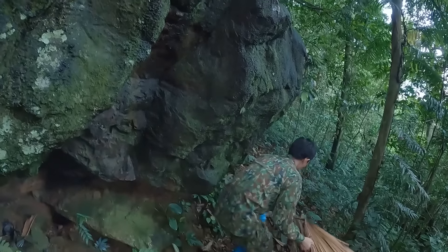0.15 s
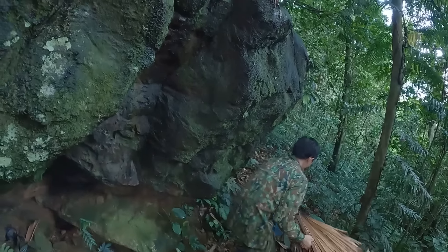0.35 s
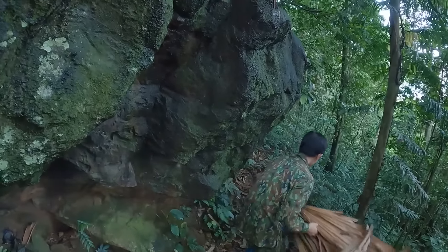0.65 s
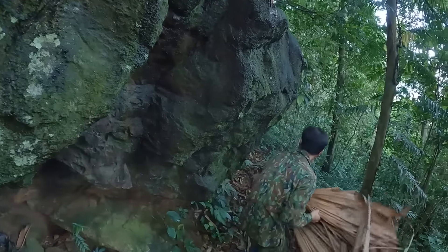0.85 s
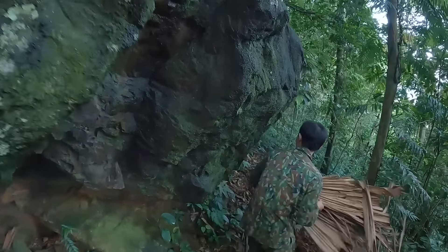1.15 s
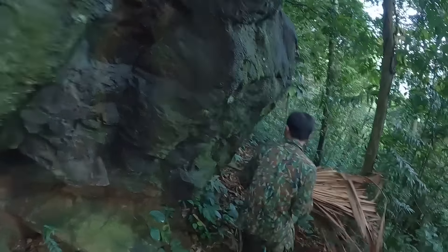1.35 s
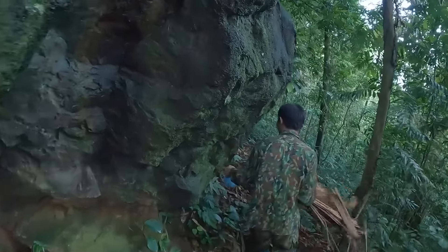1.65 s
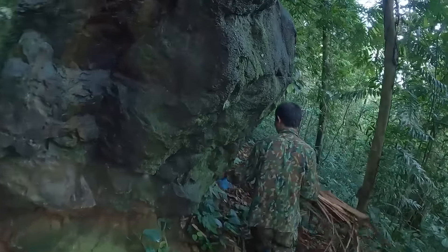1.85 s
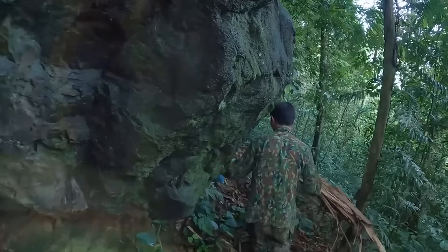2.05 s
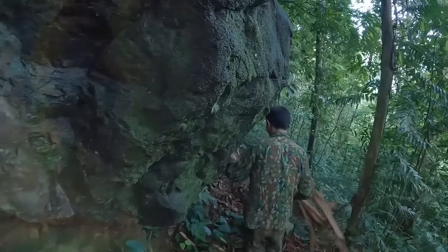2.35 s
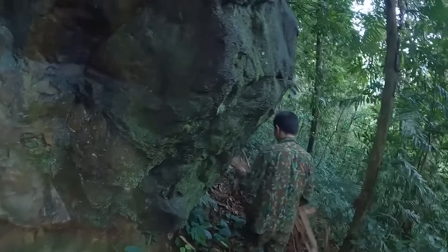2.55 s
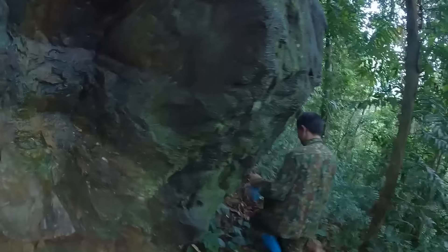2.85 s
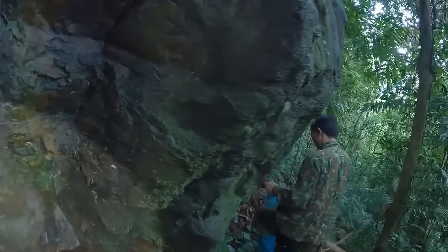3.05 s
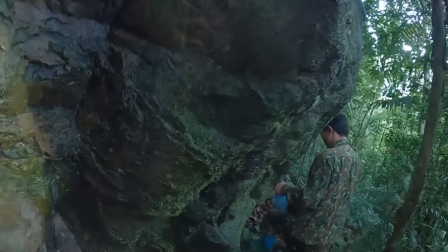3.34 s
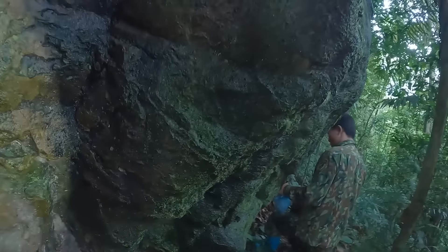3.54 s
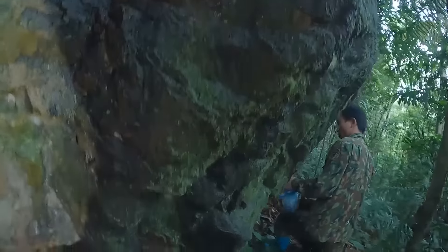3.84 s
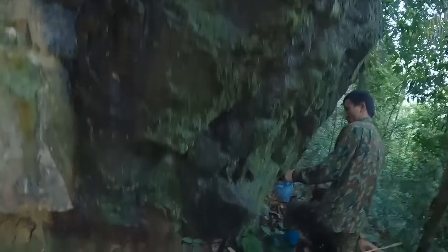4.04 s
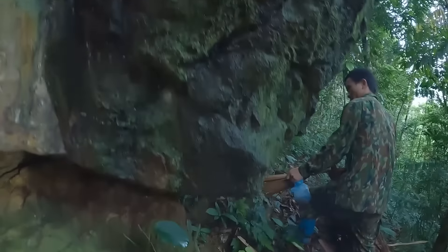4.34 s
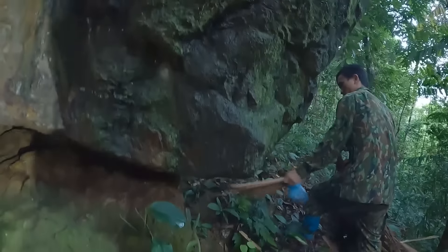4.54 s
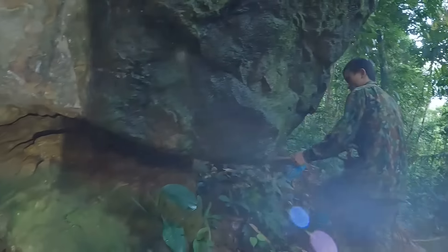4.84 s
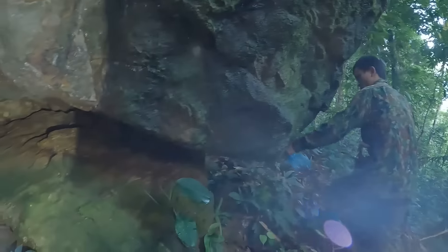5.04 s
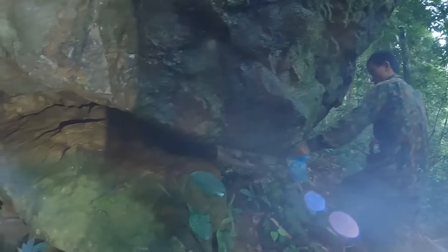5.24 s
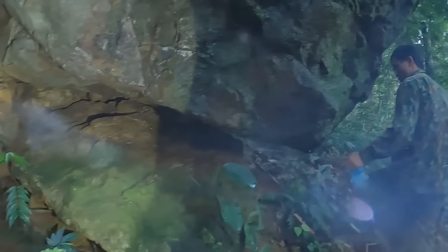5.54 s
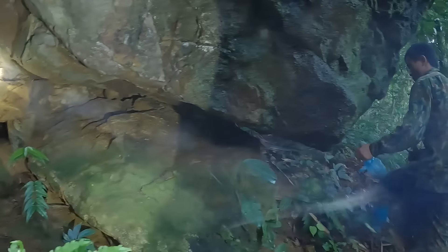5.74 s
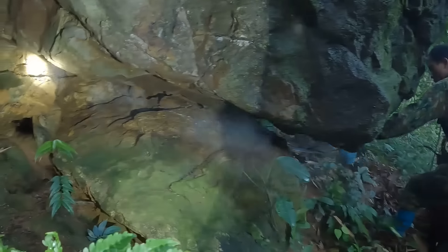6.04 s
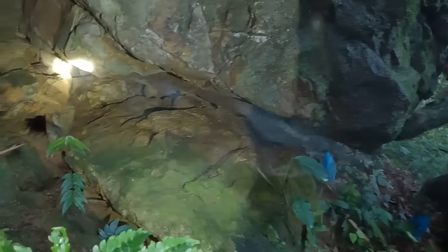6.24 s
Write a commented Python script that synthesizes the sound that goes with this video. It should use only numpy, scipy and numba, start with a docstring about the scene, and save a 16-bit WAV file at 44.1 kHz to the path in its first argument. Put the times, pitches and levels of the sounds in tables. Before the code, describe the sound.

Dry palm fronds rustle and crackle as they are lifted and dragged, peaking in a loud crunch, then thinning to sparse snaps over faint insect hiss.

```python
"""Dry palm fronds and leaf litter are lifted, dragged and stuffed under a rock face in a forest.
Countless leaf snaps, as noise under random envelopes and damped rings, make the rustle; stiff ribs scrape lower.
Single stalks crack as a tick with a dying tail; steps and handling thud in the camera body as a ring and a bump.
A thin insect band hisses over the quiet forest air, both made of filtered noise."""
import sys
import numpy as np
from scipy import signal
from scipy.fft import rfft, irfft, next_fast_len
from scipy.io import wavfile
from scipy.ndimage import uniform_filter1d
from numba import njit

SR = 44100
rng = np.random.default_rng(int(sys.argv[2]) if len(sys.argv) > 2 else 0)


def master_out(mix):
    """Clip the mix to full scale and print it as 16-bit PCM to the path in sys.argv[1]."""
    frames = np.transpose(np.atleast_2d(mix))
    ceiling = np.clip(frames, -1, 1)
    pcm = np.round(ceiling * 32767).astype(np.int16)
    wavfile.write(sys.argv[1], SR, pcm)


N = 281836

# spectrum of thin leaf edges, with two bands that the housing lifts: frequency_hz, density_db (per Hz)
EDGE_SPECTRUM = [(4200, -29.5), (5000, -17.5), (5800, -29), (6100, 4), (7500, 3), (7900, -4), (9300, -8),
                 (9800, 2), (12200, 1.5), (12600, -9.5), (14500, -22.5), (15500, -33.5)]
# spectrum of stiff ribs, with the band near 2.7 kHz that the housing lifts: frequency_hz, density_db (per Hz)
RIB_SPECTRUM = [(600, -28.5), (850, -11.5), (1000, -1), (1500, 0), (2200, -1.5), (2450, 2), (3000, 3),
                (3300, -0.5), (3900, 3), (4300, 2.5), (5000, 1), (6000, 1.5), (7500, -37)]
# spectrum of the hollow stalk: frequency_hz, density_db (per Hz)
STALK_SPECTRUM = [(260, -31.5), (310, -1), (500, -4.5), (630, -0.5), (860, 3), (1020, 6.5), (1300, -22.5)]
# the fronds drag along: time_s, edge_level_db, rib_level_db
DRAG_LEVELS = [(0, -35.5, -42.5), (0.24, -35, -38.5), (0.36, -41, -45.5), (0.52, -32, -37),
               (0.74, -30, -37.5), (1.0, -30, -36.5), (1.13, -32, -40.5), (1.45, -32, -41),
               (1.55, -31, -39), (1.8, -24.5, -31.5), (2.0, -32, -38), (2.08, -34.5, -40.5),
               (2.3, -35, -42.5), (2.43, -49, -47), (2.56, -36.5, -44.5), (3.06, -38.5, -44.5),
               (3.5, -41.5, -46.5), (3.7, -48, -51), (3.85, -44.5, -46), (4.09, -51.5, -52),
               (4.3, -49, -49.5), (4.5, -47, -47.5), (4.75, -36.5, -38.5), (4.88, -50.5, -48),
               (5.05, -53.5, -55.5), (5.4, -55, -57), (5.6, -54.5, -49.5), (5.78, -70, -70),
               (6.39, -75.5, -71.5)]


def undb(db):
    """Amplitude ratio from its logarithmic level."""
    return 10 ** (np.asarray(db) / 20)


def unit(x):
    """Normalise a signal to unit root-mean-square amplitude."""
    return x / np.sqrt(np.mean(x ** 2))


def curves(table):
    """Linear interpolation: columns of a table joined by straight lines in time."""
    s, *columns = np.transpose(table)
    return [np.interp(np.arange(N) / SR, s, c) for c in columns]


def response(shape, size, beyond=None):
    """Transfer function: gain at every bin, level interpolated over log frequency."""
    hz, db = np.transpose(shape)
    bin_hz = np.arange(size // 2 + 1) * SR / size
    return undb(np.interp(np.log(bin_hz + 1), np.log(hz), db, left=beyond, right=beyond))


def colour(x, shape):
    """Spectral shaping by a power-normalised filter; white noise keeps its level."""
    size = next_fast_len(N + 4096)
    gain = response(shape, size, beyond=-120)
    return irfft(rfft(x, size) * gain / np.sqrt(np.mean(gain ** 2)), size)[..., :N]


def pair():
    """Uncorrelated noises: what both ports share and what they do not."""
    return rng.standard_normal((2, N))


def wander(rate):
    """Random modulation: levels held 1 / rate s and slewed; spread near 1."""
    hold = int(SR / rate)
    steps = np.repeat(rng.standard_normal(N // hold + 1), hold)
    return uniform_filter1d(steps, hold)[:N] * np.sqrt(3 / 2)


def ring(power, t60):
    """Exponential decay: power dies away by 60 dB in t60 s; the mean is kept."""
    keep = np.exp(-2 * np.log(1000) / (t60 * SR))
    return signal.lfilter([1 - keep], [1, -keep], power)


def snaps(rate, spread_db, t60, bed):
    """Random impulses: many small snaps, few large, each with a short scatter off the rock, over an even bed."""
    hit = rng.random(N) < rate / SR
    power = np.zeros(N)
    power[hit] = undb(2 * spread_db * np.minimum(rng.exponential(size=hit.sum()), 5))
    power = ring(power, t60)
    # the hands set the loudness over a tenth of a second, the snaps only the grain
    grain = power / (uniform_filter1d(power, size=6000) + 1e-12)
    return np.sqrt(bed + (1 - bed) * grain)


@njit
def grains(start, turn, fade, size, length):
    """Damped oscillators, each with its own pitch (radians a sample), fade and place between the ports."""
    out = np.zeros((2, length))
    for k in range(len(start)):
        c, r, a, b = 2 * fade[k] * np.cos(turn[k]), fade[k] ** 2, np.sin(turn[k]), 0.
        for i in range(start[k], min(length, start[k] + int(5 / (1 - fade[k])))):
            a, b = c * a - r * b, a
            out[0, i] += size[0, k] * b
            out[1, i] += size[1, k] * b
    return out


def pops(centre_hz, rate, spread_oct, cycles, spread_db):
    """Buckling: bits of dry leaf snap and ring briefly around a pitch; rms near 1."""
    start = np.flatnonzero(rng.random(N) < rate / SR)
    draw = rng.standard_normal((len(start), 4)).T
    hz = np.clip(centre_hz[start] * 2 ** (spread_oct * draw[0]), 300, 15000)
    strength = undb(spread_db * draw[1]) * np.sqrt(hz / centre_hz[start])
    size = strength * np.array([np.sign(draw[2]), draw[3]])
    out = grains(start, 2 * np.pi * hz / SR, np.exp(-hz / cycles / SR), size, N)
    return out / np.sqrt(uniform_filter1d(out[0] ** 2, size=8000) + 1e-12)


@njit
def sweep(x, g, k):
    """State-variable resonance: a band-pass with moving tuning g and damping k."""
    y, b, l = np.empty(len(x)), 0., 0.
    for i in range(len(x)):
        v = (b + g[i] * (x[i] + 1e-18 - l)) / (1 + g[i] * (g[i] + k[i]))
        b, l, y[i] = 2 * v - b, l + 2 * g[i] * v, k[i] * v
    return y


def svf(x, hz, width):
    """Moving resonance scaled by its noise bandwidth; white noise keeps its level."""
    return sweep(x, np.tan(np.pi * hz / SR), width / hz) * np.sqrt(SR / (np.pi * width))


def focus(x, hz, share, shape, width):
    """Resonant excitation: part of a scrape gathers around the pitch of the bending piece; the rest stays wide."""
    wide = colour(x, shape)
    # rough bandwidth of the shape, in Hz
    span = sum(db > -12 for _, db in shape) / len(shape) * shape[-1][0]
    width_hz = width * hz
    near = np.array([svf(svf(v, hz, width_hz), hz, 2 * width_hz) for v in wide])
    near = near * np.sqrt(2 * np.pi * width_hz / SR) * np.sqrt(2 * span / SR)
    return np.sqrt(share) * near + np.sqrt(1 - share) * wide


def played(events, rest_db, rest_hz, rise, fall, sag_db):
    """Power addition: events (start, hold, pitch, levels) swell over rest; pitch is the power-weighted mean."""
    t = np.arange(N) / SR
    power = undb(2 * np.array(rest_db))
    hz = power[0] * rest_hz
    for s, hold, pitch, *db in events:
        slope = np.maximum((s - t) / rise, np.maximum(t - s - hold, 0) / fall)
        envelope = undb(-120 * slope - 2 * sag_db * np.clip(t - s, 0, hold))
        swell = undb(2 * np.array(db))[:, None] * envelope
        power, hz = power + swell, hz + swell[0] * pitch
    return np.sqrt(power), hz / power[0]


def rustle():
    """Shared excitation: thin edges tick, ribs scrape and pop, the stalk groans; some snaps shake all three."""
    # a hand closes on the bundle: start_s, hold_s, edge_level_db, rib_level_db, rib_pitch_hz, stalk_level_db
    grabs = [(0.128, 0.074, -31, -33, 2600, -42.5), (0.413, 0.079, -32.5, -34.5, 1800, -72),
             (0.572, 0.053, -34, -40, 2540, -66), (0.732, 0.022, -29, -42, 2590, -65),
             (0.882, 0.12, -30, -34.5, 3310, -53), (1.139, 0.02, -30.5, -39.5, 2700, -80),
             (1.249, 0.015, -26, -24, 1503, -38), (1.298, 0.054, -30, -32.5, 2360, -54),
             (1.57, 0.028, -21.5, -23.5, 1883, -24.5), (1.608, 0.066, -15.5, -12.5, 2397, -26),
             (1.715, 0.02, -29, -19.5, 2137, -33.5), (1.853, 0.088, -23.5, -26.5, 2750, -61),
             (1.912, 0.095, -18, -25, 2646, -31), (2.308, 0.057, -33.5, -41, 2755, -64),
             (2.403, 0.054, -43, -47, 1633, -50.5), (2.81, 0.12, -35, -39.5, 2417, -40.5),
             (2.952, 0.057, -35, -44.5, 2000, -55), (3.568, 0.13, -43, -51, 2870, -54),
             (3.993, 0.053, -40.5, -39.5, 2760, -62), (4.123, 0.063, -39.5, -55, 1400, -69),
             (4.216, 0.074, -38.5, -46.5, 3136, -54.5), (4.369, 0.046, -44, -33.5, 2284, -45),
             (4.564, 0.11, -30, -21, 3310, -41.5), (4.652, 0.062, -38, -31.5, 2590, -55),
             (4.761, 0.077, -40, -40, 4390, -74), (4.926, 0.031, -41.5, -45.5, 3230, -60),
             (5.364, 0.12, -45, -48.5, 2005, -61.5), (5.234, 0.026, -47.5, -52, 3520, -74),
             (5.442, 0.035, -27, -18.5, 2006, -29.5), (5.494, 0.039, -36, -29, 2250, -43.5),
             (6.369, 0.033, -30, -28, 1490, -30.5)]
    # the hollow stalk is knocked: start_s, hold_s, pitch_hz, level_db
    knocks = [(0.115, 0.024, 855, -44), (0.225, 0.023, 600, -44), (0.6, 0.088, 390, -42),
              (0.8, 0.054, 436, -42.5), (1.24, 0.0063, 824, -20), (1.59, 0.09, 330, -36),
              (1.865, 0.047, 1040, -36.5), (1.972, 0.045, 990, -29.5), (2.4, 0.068, 756, -43),
              (2.775, 0.019, 326, -41.5), (2.825, 0.07, 865, -46), (2.98, 0.056, 662, -47),
              (3.455, 0.018, 391, -45.5), (3.75, 0.1, 392, -50), (4.01, 0.069, 380, -50),
              (4.13, 0.035, 390, -48.5), (4.371, 0.0061, 445, -30.5), (4.62, 0.043, 575, -36.5),
              (5.44, 0.017, 313, -28), (5.5, 0.064, 335, -50)]
    # level of the ribs above 4 kHz: time_s, level_db (re their usual colour)
    rib_treble = [(0, 6.5), (.4, -9), (.6, 8.5), (1.5, -1.5), (1.75, 2), (2.0, 3.5), (2.1, 4.5), (2.5, -2),
                  (4.3, 0), (6.39, 1)]
    # part of the rib scrape gathered at its pitch: time_s, share (0-1)
    rib_focus = [(0, 0.88), (2.05, 0), (2.12, 0.55), (2.42, 0.5), (2.5, 0), (6.39, 0)]
    drag_rib_hz, drag_stalk_db = 2678, -16  # stalk level re ribs
    stalk_centre_hz, stalk_wander_oct, stalk_wander_per_s = 656, 0.73, 10
    # rise and fall: time to gain or lose 60 dB; sag: the grip slackens while it holds
    grab_rise_s, grab_fall_s, grab_sag_db_per_s = 0.049, 0.15, 21
    knock_rise_s, knock_fall_s, knock_sag_db_per_s = 0.013, 0.08, 58.5

    edge_db, rib_db = curves(DRAG_LEVELS)
    # the ribs come first because the first level steers the pitch
    events = [(s, hold, hz, rib, edge, stalk) for s, hold, edge, rib, hz, stalk in grabs]
    gains, rib_hz = played(events, [rib_db, edge_db, rib_db + drag_stalk_db], drag_rib_hz,
                           grab_rise_s, grab_fall_s, grab_sag_db_per_s)
    rib_gain, edge_gain, stalk_gain = gains
    stalk_hz = np.clip(stalk_centre_hz * 2 ** (stalk_wander_oct * wander(stalk_wander_per_s)), 300, 950)
    (stalk_gain,), stalk_hz = played(knocks, [20 * np.log10(stalk_gain)], stalk_hz,
                                     knock_rise_s, knock_fall_s, knock_sag_db_per_s)

    shared = snaps(rate=600, spread_db=2.5, t60=0.025, bed=0.5)
    edges = pair() * snaps(rate=11000, spread_db=0.5, t60=0.09, bed=0.75)
    # lone dry ticks stand out of the wash
    ticks = pair() * snaps(rate=70, spread_db=4.0, t60=0.01, bed=0) * undb(-9)
    edge_pops = pops(np.full(N, 8500.), rate=780, spread_oct=0.56, cycles=260, spread_db=7.5)
    edges += ticks + undb(-9.5) * edge_pops

    scrape = pair() * snaps(rate=2100, spread_db=2.5, t60=0.031, bed=0.41)
    scrape = shared * (undb(-3.5) * ticks + scrape)
    ribs = focus(scrape, rib_hz, curves(rib_focus)[0], RIB_SPECTRUM, width=0.35)
    ribs += undb(-1.5) * shared * pops(rib_hz, rate=800, spread_oct=0.5, cycles=12, spread_db=3)
    treble = signal.sosfiltfilt(signal.butter(4, 4000, "high", fs=SR, output="sos"), ribs)
    ribs += (undb(curves(rib_treble)[0]) - 1) * treble

    stalk = focus(pair() * shared, stalk_hz, 0.9, STALK_SPECTRUM, width=0.42)
    return colour(edges * shared, EDGE_SPECTRUM) * edge_gain + ribs * rib_gain + stalk * stalk_gain


def thuds():
    """Structure-borne sound: grip and footfall shake the camera body, a boxy ring and a duller bump."""
    # thuds in the camera body: start_s, hold_s, ring_level_db, ring_pitch_hz, dull_level_db
    blows = [(0.188, 0.07, -53.5, 215.5, -73), (0.44, 0.024, -55, 208, -78), (0.49, 0.038, -64, 198, -60),
             (0.582, 0.054, -53, 202, -78), (1.24, 0.081, -53.5, 195.7, -80),
             (1.531, 0.029, -38, 169.8, -60), (1.574, 0.093, -25.5, 233.9, -40.5),
             (1.73, 0.014, -36.5, 204.6, -61.5), (1.805, 0.087, -45.5, 228.6, -53.5),
             (1.913, 0.069, -39.5, 222.7, -67), (2.485, 0.021, -55.5, 170, -78),
             (2.794, 0.061, -58, 189.2, -51.5), (2.869, 0.069, -39.5, 157.2, -43.5),
             (2.976, 0.053, -46, 175.8, -49), (3.043, 0.53, -51, 161.2, -72),
             (3.114, 0.034, -52, 162.7, -63), (3.22, 0.047, -59, 184, -64), (3.383, 0.1, -50.5, 177, -83),
             (3.484, 0.047, -49.5, 163, -44), (3.977, 0.093, -63, 194.7, -57),
             (4.182, 0.15, -69.5, 158.5, -60), (4.366, 0.021, -54, 239, -72), (4.444, 0.027, -57, 206, -81),
             (4.556, 0.079, -37, 202.7, -48), (4.673, 0.065, -48, 202.3, -61),
             (5.44, 0.016, -35.5, 268.6, -41), (5.485, 0.043, -50.5, 243, -68),
             (6.008, 0.049, -70.5, 160.6, -69), (6.119, 0.089, -70, 167.5, -62.5),
             (6.261, 0.053, -77, 152, -59), (6.37, 0.033, -41.5, 183, -46)]
    # spectrum of the wide part of the boxy ring: frequency_hz, density_db (per Hz)
    body_spectrum = [(100, -29), (135, -4.5), (165, 6), (200, -15), (240, -10.5), (290, -22), (350, -28.5)]
    # spectrum of the dull bump: frequency_hz, density_db (per Hz)
    dull_spectrum = [(25, -28.5), (45, -20.5), (90, -3), (112, -5), (135, -35)]
    rise_s, fall_s, sag_db_per_s = 0.049, 0.18, 18.5  # time to gain or lose 60 dB; slackening in the hold
    grip_db, grip_dull_db, grip_hz = -68.5, -87.5, 190  # rumble between thuds, with the ribs at -45 dB
    grip_follows = 0.631  # dB the rumble gains for each dB of the dragged ribs
    body_width_hz = 53
    steady = 0.55  # share of the narrow ring's power that is a clean tone

    effort_db = grip_follows * (curves(DRAG_LEVELS)[1] + 45)
    rest_db = [grip_db + effort_db + 4.5 * wander(12), grip_dull_db + effort_db + 1.9 * wander(2.4)]
    events = [(s, hold, hz, db, dull) for s, hold, db, hz, dull in blows]
    (gain, dull_gain), ring_hz = played(events, rest_db, grip_hz, rise_s, fall_s, sag_db_per_s)

    width = np.full(N, float(body_width_hz))
    shaken = pair() * snaps(rate=9.9, spread_db=10.0, t60=0.68, bed=1.0)
    boxy = np.array([svf(svf(v, ring_hz, width), ring_hz, 3 * width) for v in shaken])
    phase = 2 * np.pi * np.cumsum(ring_hz * (1 + 0.0504 * wander(25))) / SR
    tone = np.sqrt(2) * np.sin(phase) * undb(1.2 * wander(20))
    # the tone is common to both ports
    boxy = np.sqrt(1 - steady) * unit(boxy) + np.sqrt(steady) * tone * [[1], [0]]
    boxy = boxy + undb(-5.5) * colour(pair(), body_spectrum)
    return gain * boxy + dull_gain * colour(pair(), dull_spectrum)


def forest():
    """Broadband and narrow-band noise: quiet air with faint far ticks, and a band of distant insects."""
    # spectrum of the air: frequency_hz, density_db (per Hz)
    air_spectrum = [(24, -34.5), (40, -8), (182, -7), (291, -8.5), (466, -8), (728, -14), (1260, -4.5),
                    (2850, -14), (3350, -10), (3750, -3), (4500, -9.5), (5430, -28), (6950, -18.5),
                    (12300, -29.5), (15000, -40.5)]
    air_db, insect_db = -60.5, -64
    hz, w = 3700, 170  # insect pitch and width, Hz

    air = pair() * snaps(rate=82, spread_db=2.0, t60=0.05, bed=0.84)
    band = [(hz - 2 * w, -25), (hz - w, -4), (hz, 0), (hz + w, -4), (hz + 2 * w, -25)]
    return colour(air, air_spectrum) * undb(air_db) + colour(pair(), band) * undb(insect_db)


def cracks():
    """Brittle fracture: a sharp tick, then splinters and echo dying away in three colours, treble first."""
    # single cracks: start_s, tick_level_db (re the tail), bright_tail_db, middle_tail_db, middle_pitch_hz
    breaks = [(0.155, 2, -21, -31.5, 2820), (0.258, 4, -26.5, -28, 2400), (0.276, 4, -25.5, -26.5, 2270),
              (0.411, -3.5, -47, -25.5, 2600), (0.428, -7, -34, -14, 1620), (0.466, 1.5, -40, -26, 1290),
              (0.468, 0, -21, -29.5, 2870), (0.577, -4, -29, -28, 2700), (0.598, -6, -22, -18.5, 2320),
              (0.631, -3.5, -18.5, -28.5, 2640), (0.665, -7.5, -20.5, -38, 2590),
              (0.694, 9.5, -37, -30, 2460), (0.851, 5, -24, -27.5, 2980), (0.899, -4, -17.5, -23, 3510),
              (1.2391, 11, -20.5, -16, 1160), (1.244, 9, -19.5, -18, 1535), (1.248, 11, -22, -27, 3190),
              (1.422, -4.5, -25.5, -28, 2600), (1.514, 0.5, -22.5, -29.5, 2640),
              (1.543, -10.5, -27.5, -23, 1543), (1.584, -6.5, -11.5, -11.5, 1371),
              (1.608, -7, -1, -5.5, 3880), (1.634, 0.5, -14.5, -16.5, 1700), (1.653, 1, -24, -13, 2140),
              (1.663, 9.5, -25.5, -11.5, 1330), (1.72, -3.5, -9.5, -11, 1200),
              (1.74, -2.5, -19.5, -18, 2940), (1.773, -1.5, -20, -25.5, 3600),
              (1.793, -3, -19.5, -23.5, 2800), (1.863, -8.5, -13, -29, 2545),
              (1.914, -10.5, -22, -13, 1020), (1.928, -2.5, -10.5, -31.5, 2566),
              (1.942, -2, -14.5, -14.5, 5000), (1.969, 0.5, -20, -31, 2700),
              (2.047, -8, -18.5, -41.5, 5180), (2.35, 1, -34, -53, 2660), (2.403, 9, -40, -33, 1662),
              (2.465, -5.5, -21, -35.5, 4910), (2.702, -3.5, -27, -44, 2700),
              (2.774, 3.5, -21.5, -36.5, 3000), (2.873, -4.5, -20.5, -37.5, 3050),
              (2.985, -8.5, -34, -34, 1100), (3.101, -3.5, -29, -35, 2945), (3.245, -9, -50, -34.5, 1326),
              (3.284, 10, -37.5, -41.5, 2510), (3.33, -7, -33, -37, 2800), (3.6, -7, -24, -41, 5050),
              (3.634, -9, -33.5, -57, 3030), (3.717, -1.5, -38, -39.5, 1266),
              (3.812, 11.5, -27, -47.5, 2540), (3.986, -8.5, -26.5, -31, 3445),
              (3.996, -6, -40.5, -31, 3500), (4.127, -8, -49.5, -33.5, 1275),
              (4.161, -18, -27.5, -38, 1174), (4.254, 5, -25, -36.5, 4120), (4.28, -4, -30, -33.5, 3385),
              (4.318, 1.5, -28, -30.5, 5400), (4.372, 12, -30.5, -27.5, 2404),
              (4.391, 3.5, -27.5, -24, 1790), (4.414, 8.5, -25, -31.5, 5300), (4.453, -7, -33, -56, 2960),
              (4.49, 8.5, -41, -44.5, 4500), (4.535, 2.5, -27.5, -29, 3240), (4.554, 9, -23.5, -22.5, 3503),
              (4.608, -4.5, -24, -12, 5580), (4.6408, 13, -20, -20, 3340), (4.785, 7.5, -20.5, -21, 4360),
              (4.946, -2.5, -38, -59, 2920), (5.416, -5, -38.5, -27, 1650),
              (5.429, -0.5, -33.5, -34.5, 4530), (5.44, 11, -32.5, -18, 2158),
              (5.453, 3.5, -26, -21.5, 4714), (5.463, 5.5, -25.5, -16, 1367), (5.508, 8, -41, -28.5, 2900),
              (5.655, 8.5, -25, -45.5, 2200), (5.728, 10, -50.5, -49, 2930), (6.108, 0, -53.5, -53, 3510),
              (6.162, -11, -49.5, -56, 3670), (6.358, -2.5, -24.5, -18.5, 1386)]
    t60_s, rise_s = 0.12, 0.0028  # decay of the middle tail; rise of all tails
    deep_db_at_1khz, deep_db_per_oct = -26.5, -14.5  # deep tail re middle tail, less for higher cracks
    knock_db = -27.5  # low knock re the first tick

    power, tick_power, pitch = np.zeros((3, N)), np.zeros((2, N)), np.full(N, 2000.)
    t = np.arange(SR // 6) / SR
    decay = undb(-60 * t / t60_s) * np.minimum(t / rise_s, 1)
    decay_power = np.array([[1.4], [1], [0.8]])  # bright, middle, deep
    for s, tick_db, bright_db, middle_db, middle_hz in breaks:
        i = int(s * SR)
        n = min(len(t), N - i)
        deep_db = middle_db + deep_db_at_1khz + deep_db_per_oct * np.log2(middle_hz / 1e3)
        tail = decay[:n] ** decay_power * undb([[bright_db], [middle_db], [deep_db]])
        power[:, i:i + n] += tail ** 2
        tick = np.exp(-t[:n] / 0.0016) * undb(tick_db + np.array([[bright_db], [middle_db]]))
        tick_power[:, i:i + n] += tick ** 2
        pitch[i:] = middle_hz

    bright_tick, middle_tick = (np.sign(pair()) * np.sqrt(p) for p in tick_power)
    splinters = snaps(rate=1200, spread_db=2, t60=0.008, bed=0.5)
    bright, middle, deep = (pair() * splinters * np.sqrt(p) for p in power)
    high = colour(bright + bright_tick, EDGE_SPECTRUM)
    # the first tick is wider, the tail gathers more at the pitch of the piece
    mid = focus(middle, pitch, 0.75, RIB_SPECTRUM, width=0.5)
    mid = mid + focus(middle_tick, pitch, 0.6, RIB_SPECTRUM, width=0.6)
    low = colour(deep, STALK_SPECTRUM) + undb(knock_db) * colour(middle_tick, STALK_SPECTRUM)
    return high + mid + low


def afterhum():
    """Exponentially decaying narrow-band noise: a rough hum trails the last big crunch."""
    # onset and decay of the hum: start_s, pitch_hz, width_hz, level_db, t60_s
    start_s, pitch_hz, width_hz, level_db, t60_s = (5.445, 1290, 80, -29, .5)
    t = np.arange(N) / SR - start_s
    fade = (t > 0) * undb(level_db - 60 * np.maximum(t, 0) / t60_s)
    centre, width = np.full(N, float(pitch_hz)), np.full(N, float(width_hz))
    hum = np.array([svf(svf(v, centre, width), centre, 2 * width) for v in pair()])
    return fade * unit(hum)


def ports(mid_side):
    """Sum and difference: left and right from the shared and unshared parts, weighted by frequency."""
    # unshared part: frequency_hz, side_minus_mid_db
    side_levels = [(30, -6), (70, -8.5), (170, -15.5), (350, -12.5), (1300, -15.5), (2400, -16.5),
                   (4400, -22), (8000, -13), (13000, -5)]
    size = next_fast_len(N)
    side = irfft(rfft(mid_side[1], size) * response(side_levels, size), size)[:N]
    return np.array([mid_side[0] + side, mid_side[0] - side])


def scene():
    """Superposition of all sources, placed between the ports by level difference."""
    # level of the leaves above 9.5 kHz: time_s, level_db (re their usual colour)
    top_band = [(0, -6), (1.2, -6), (2.5, -2.5), (3.4, -5.5), (3.8, 2), (4.4, -1), (4.7, -1), (6.39, -1.5)]
    # where the hands work: time_s, left_minus_right_db
    pan = [(0, -2), (2, -1.5), (3.7, -0.5), (4.2, -2), (6.39, -2)]
    leaves = rustle() + cracks() + afterhum()
    top = signal.sosfiltfilt(signal.butter(6, 9500, "high", fs=SR, output="sos"), leaves)
    leaves = leaves + (undb(curves(top_band)[0]) - 1) * top
    pan_db, = curves(pan)
    return ports(leaves + thuds() + forest()) * undb(np.array([pan_db, -pan_db]) / 2)


def record(dry):
    """Linear filtering by housing and ports, then clipping at full scale and a low-pass."""
    # a dip between two resonances of the housing: frequency_hz, gain_db
    housing = [(3800, -1), (4000, -6), (4650, -5), (4850, -0.5)]
    # the left port faces the fronds: frequency_hz, left_minus_right_db
    balance = [(3000, 0.5), (6000, 1.5), (10000, 3.5), (13500, 6)]
    # phase by which the left port leads; negative is late: frequency_hz, lead_rad
    port_phase = [(0, -0.077), (3190, -0.79), (5770, -0.65), (15200, -0.085)]
    top_hz = 15570
    size = next_fast_len(N)
    lean = np.sqrt(response(balance, size))
    bin_hz = np.arange(len(lean)) * SR / size
    lead = np.exp(1j * np.interp(bin_hz, *np.transpose(port_phase)))
    port_gains = np.array([lean * lead, 1 / lean])
    heard = irfft(rfft(dry, size) * response(housing, size) * port_gains, size)[:, :N]
    low_pass = signal.ellip(8, 0.2, 70, top_hz, fs=SR, output="sos")
    return signal.sosfilt(low_pass, np.clip(heard, -1, 1))


dry = scene()
out = record(dry)
master_out(out)
```